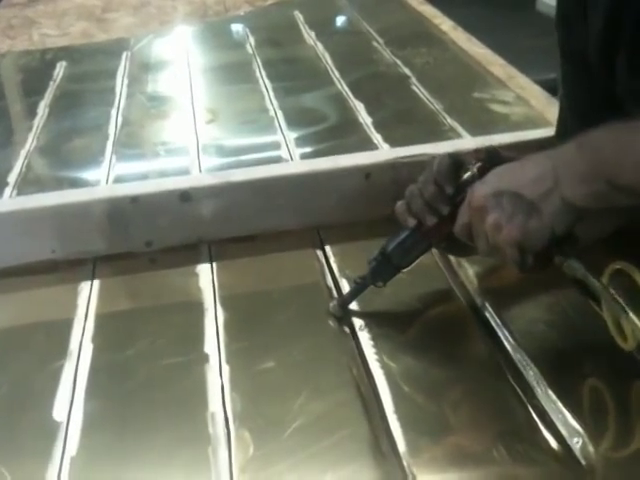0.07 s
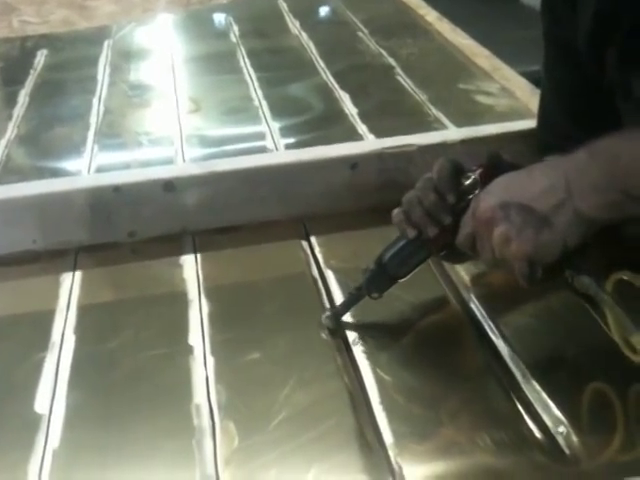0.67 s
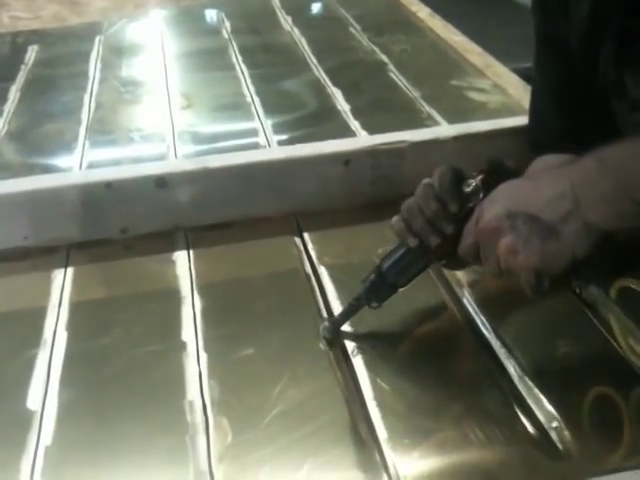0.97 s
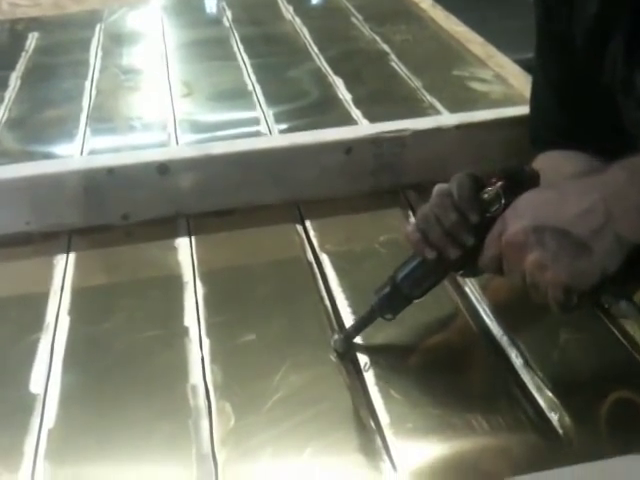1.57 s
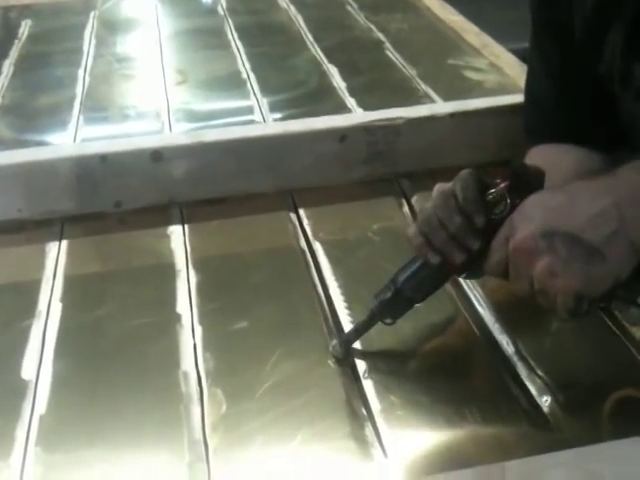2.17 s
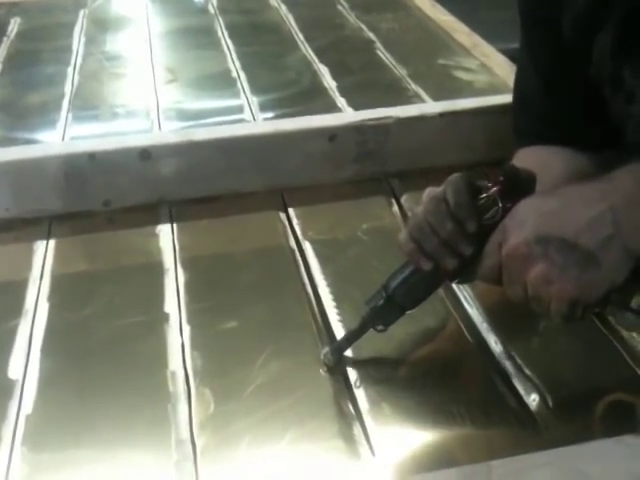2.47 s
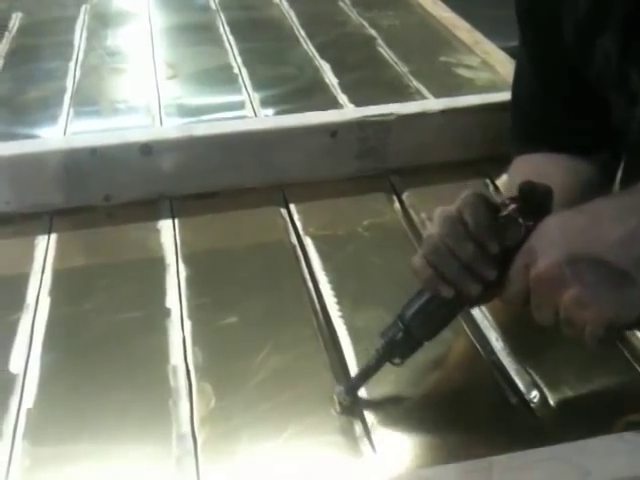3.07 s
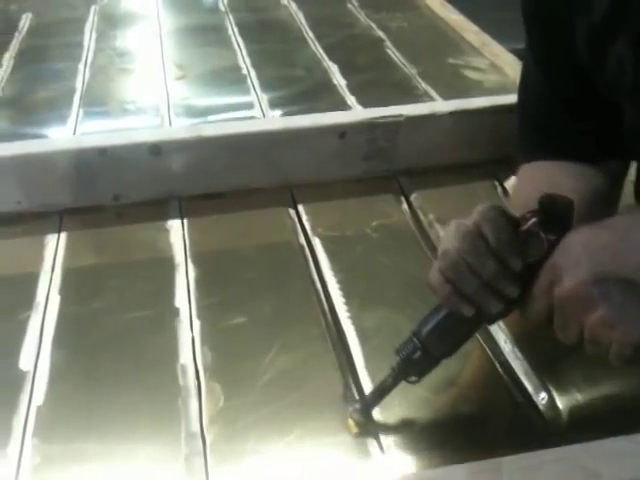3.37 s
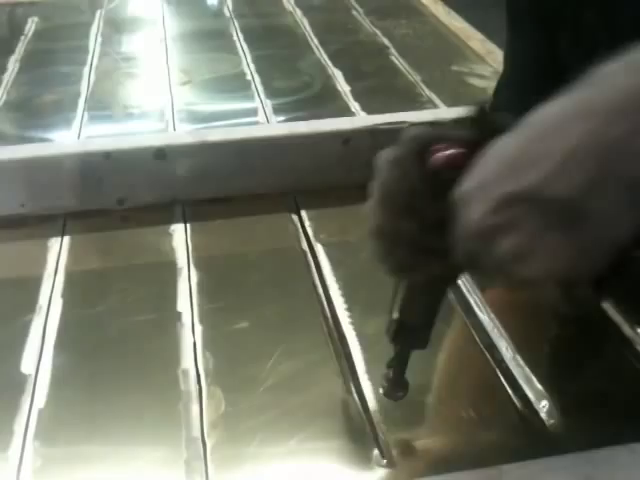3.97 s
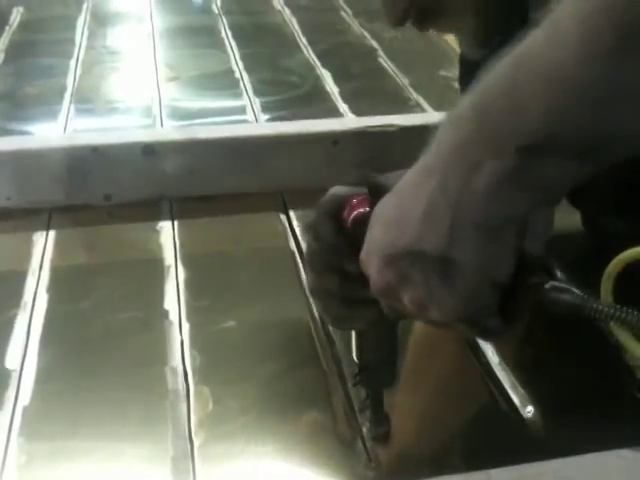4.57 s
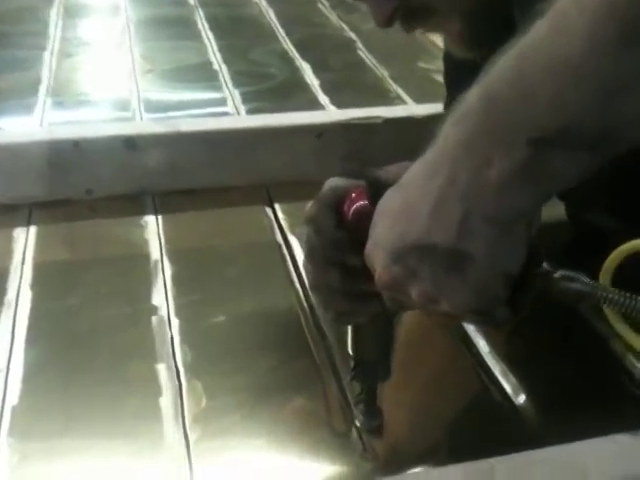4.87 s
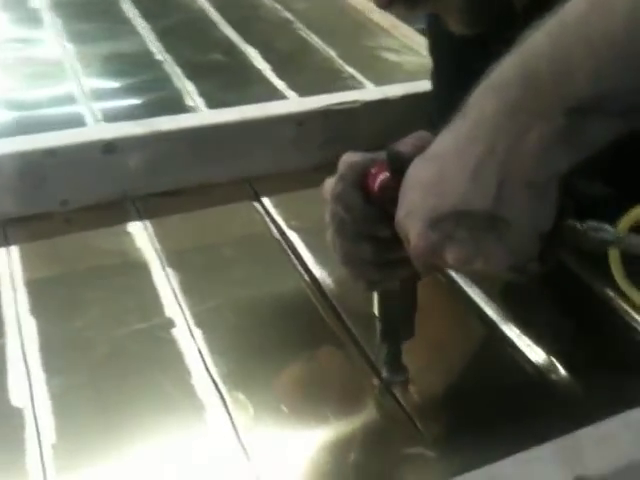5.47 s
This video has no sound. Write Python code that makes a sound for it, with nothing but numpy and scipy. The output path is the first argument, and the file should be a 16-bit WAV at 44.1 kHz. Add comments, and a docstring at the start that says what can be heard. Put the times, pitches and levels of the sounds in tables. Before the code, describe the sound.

From the start, a hand-held air hammer strikes a bronze sheet close to the microphone, about thirty-eight blows a second. The blows merge into a loud, buzzing metallic clatter with low thumps, a bright steel ring and strong pulsing exhaust hiss. The sound is slightly overdriven, and gusts of air pop on the microphone twice just before 1 second and again at about 3.0 and 3.2 seconds. At 3.7 seconds the hammer stops, with a bright tick as the tool lifts and a short workshop reverberation. In the pause, another machine throbs and drones faintly further off. At 4.9 seconds two quick spits of air lead into a second burst, faster at about forty-five blows a second. It slows slightly while hammering on to the end, at around 5.6 seconds.

```python
"""A hand-held air hammer works along a seam in bronze sheet, stops, is set down again and runs on faster.
Each stroke gives a valve thump, a blow that excites the modes of sheet and steel tool, a hiss of
turbulent exhaust and a return knock. The hall reverberates, and another machine throbs further off.
The close microphone is overdriven, and a few gusts of exhaust air pin it to its limit."""
import sys
import numpy as np
from scipy import signal
from scipy.fft import rfft, irfft
from scipy.io import wavfile
from scipy.ndimage import uniform_filter1d

SR = 44100
rng = np.random.default_rng(int(sys.argv[2]) if len(sys.argv) > 2 else 0)


def generate_wav(signal):
    """Clip the signal to [-1, 1] and save it as 16-bit WAV at the path in sys.argv[1]."""
    frames = np.transpose(np.atleast_2d(signal))
    scaled = np.clip(frames, -1, 1) * 32767
    pcm = np.round(scaled).astype(np.int16)
    wavfile.write(sys.argv[1], SR, pcm)


N = 243866
T = np.arange(N) / SR
MACHINE_HZ = 23.35  # stroke rate of the far machine


def hammer():
    """Periodic forcing: one stroke cycle times the exhaust, piston, sheet and tool in both bursts."""
    # stroke rate, nearly steady in the first burst, sagging in the second (time [s], rate [Hz])
    first_rate = [(0, 38.18), (.31, 38.35), (2.08, 37.55), (2.27, 38.03), (2.79, 37.52), (3.15, 38.82),
                  (3.68, 38.07)]
    second_rate = [(4.9, 45.2), (5.53, 40.96)]
    # trigger pulls (opening [s], closing [s], air gain [dB], blow gain [dB], thump gain [dB])
    pulls = [(-1, 3.658, 0.3, -1.5, -1.4), (4.907, 6, -0.6, 1, -2)]
    air, force, thump = sum(trigger_pull(*pull) for pull in pulls)
    thump = thump * undb(-3.5 * near(.65, reach_s=.35))  # an early, brief dip
    restart_s = pulls[1][0]
    phase = np.where(T < restart_s, cycle(first_rate, start_s=.0216), cycle(second_rate, start_s=4.8958))
    strokes = air * exhaust(phase) + thump * piston(phase) + sheet(phase, force) + tool(phase, force)
    return strokes + tick_and_spits()


def trigger_pull(open_s, close_s, air_db, blow_db, thump_db):
    """Inertia: the piston's swing lags the air, then coasts. Gives air flow, blow force and thump gain."""
    coast_s, bite_s = .022, .22
    air = envelope(open_s, close_s, attack_s=.014, release_s=.012)
    swing = envelope(open_s, close_s + coast_s, attack_s=.036, release_s=.008)
    bite_db = 3.5 * np.exp(-np.abs(T - open_s) / bite_s)  # harder just after the tool is set down
    force = air * swing ** 3 * undb(blow_db + bite_db)
    return np.array([air * undb(air_db), force, swing * undb(thump_db)])


def sheet(phase, force):
    """Impact excitation: blow and return knock ring the bronze; a mode is loudest struck at its antinode."""
    # sheet modes (frequency [Hz], t60 [s], relative level [dB], tip at antinode [s], reach [s])
    bronze_modes = [(138.4, 0.19, -10, 5.35, 0.27), (188.6, 0.24, -11, 2.4, 1.1), (256, .07, -11, 5.3, .25),
                    (275.4, 0.099, -4, 0.51, 0.41), (333.4, 0.14, -10, 2.9, 0.85),
                    (490, 0.14, -4, 3.29, 0.35), (727, 0.044, -5, 2.57, 0.5), (744, 0.2, -4, 1.8, 0.12),
                    (795, 0.066, -2, 0.37, 0.49), (902, 0.039, -3.5, 5.27, 0.21),
                    (917, .05, -8, 1.28, 0.46), (949.7, 0.17, -5, 0.26, 0.33), (940, 0.22, -7, 2.28, 0.14),
                    (1084, 0.066, -3, 0.91, 0.48), (1125, 0.035, -0.5, 0.19, 0.47),
                    (1140, 0.14, -3, 2.47, 0.35), (1143, 0.056, -6, 5.46, 0.15),
                    (1230, 0.021, -1, 1.67, 0.19), (1407, 0.059, -2.5, 1.1, 0.34),
                    (1385, .05, -6.5, 5.12, 0.1), (1570, 0.07, -8, 0.42, .3), (1645, 0.077, -7.5, 2, 0.36),
                    (1810, 0.11, -9.5, 0.14, 0.3), (2096, 0.041, -6.5, 1.44, 0.38)]
    # spectrum of the clang (frequency [Hz], gain [dB])
    spectrum = [(120, -42.5), (400, -19), (600, -6), (800, 0), (1250, 0), (1700, -3), (2100, -5.5),
                (2600, -10), (4500, -7), (7000, -13.5), (12000, -14), (20000, -27)]
    blows = strikes(phase, at=.145, scatter_db=.6, jitter_s=.0001)
    knocks = strikes(phase, at=.67, scatter_db=1, jitter_s=.00025)
    hits = force * (blows + undb(-8) * knocks)
    clang = level(colour(dense_modes(hits, t60=.054, mixes=16), spectrum), -15.5)
    return clang + undb(-18) * modes(hits, bronze_modes)


def tool(phase, force):
    """Impact excitation: the piston rings the steel tool, whose tip then cracks against the sheet."""
    # tool modes, varying with tilt (frequency [Hz], t60 [s], relative level [dB], peak [s], reach [s])
    steel_modes = [(10850, .028, -1, 3.45, .3), (10900, .018, -8, 2, 1.6), (9900, .012, -8, .8, 1.6),
                   (9950, .01, -7, 5.05, .15), (13800, .03, -17, 1.5, 2), (14300, .03, -17, 1, 2)]
    # spectrum of the tip's crack (frequency [Hz], gain [dB])
    spectrum = [(800, -16), (2000, -2.5), (4000, -2), (5500, 0.5), (8000, -18), (14000, -2), (18000, 3)]
    hits = force * strikes(phase, at=.09, scatter_db=2.8, jitter_s=.0001)
    ringing = undb(-18) * modes(hits, steel_modes)
    since_contact = (phase - .22) % 1
    crack = force * rng.standard_normal(N) * np.exp(-since_contact / .053)
    return ringing + level(colour(crack, spectrum), -19)


def piston(phase):
    """Pressure pulses: the valve thumps as the stroke starts, and more weakly on the way back."""
    # spectrum of the thump (frequency [Hz], gain [dB])
    spectrum = [(70, -38.5), (120, -22), (155, -8.5), (190, 0), (230, -2.5), (280, -2), (370, -6.5),
                (450, -10), (600, -14.5), (1500, -33.5)]
    forward = strikes(phase, at=.94, scatter_db=.3, jitter_s=.0001)
    back = strikes(phase, at=.6245, scatter_db=.5, jitter_s=.0005)
    return level(colour(forward + undb(-12) * back, spectrum), -18.5)


def exhaust(phase):
    """Turbulent jet noise: a steady leak, a spit at the valve and a long hiss as the cylinder empties."""
    # spectrum of the jet (frequency [Hz], gain [dB])
    spectrum = [(300, -10.5), (1500, -5), (3000, -7), (5500, -3), (6600, -0.5), (7600, 2.5), (8600, -5.5),
                (10200, 0.5), (11500, -2), (15000, -7.5), (19000, -8)]
    flow = .22 + .5 * pulse(phase, at=.049, width=.048) + pulse(phase, at=.46, width=.097)
    # no two strokes are equally strong
    wander_db = 1.6 * np.interp(phase % 256, np.arange(256), rng.standard_normal(256))
    return level(colour(undb(wander_db) * flow * rng.standard_normal(N), spectrum), -10)


def tick_and_spits():
    """Noise transients: a bright tick as the tool lifts off, two spits of air as the trigger reopens."""
    # the tick, then the two spits (time [s], reach [s], level [dB])
    transients = [(3.727, 0.0017, -17.5), (4.891, 0.0023, -14.5), (4.91, 0.0022, -13)]
    # their common spectrum (frequency [Hz], gain [dB])
    spectrum = [(500, -24), (2000, -10), (4000, -2), (6000, 2), (10000, 3), (12000, -3.5), (18000, -9)]
    gain = sum(undb(db) * near(time_s, reach_s) for time_s, reach_s, db in transients)
    return gain * level(colour(rng.standard_normal(N), spectrum), 0)


def gusts():
    """Damped response: exhaust gusts pull on the microphone diaphragm; some make it rebound and settle."""
    # gusts (time [s], pull length [s], rebound length [s], relative pressure [1])
    puffs = [(.8598, .0075, 0, 1.2), (.9648, .0076, .0132, 2.2), (3.028, .017, .0015, 2.4),
             (3.1843, .018, .003, 2.9), (5.099, .007, 0, .15)]
    pressure = np.zeros(N)
    for start_s, pull_s, rebound_s, strength in puffs:
        settle_s = .27 * rebound_s
        for length_s, push in (pull_s, -1), (rebound_s, 1), (settle_s, -.5):
            pressure += strength * push * ((T >= start_s) & (T < start_s + length_s))
            start_s += length_s
    return uniform_filter1d(uniform_filter1d(pressure, size=40), size=40)


def hall(direct):
    """Reverberation: the crowded modes of the room prolong the direct sound."""
    # spectrum of the room's response (frequency [Hz], gain [dB])
    spectrum = [(80, -22), (250, -2.5), (600, 1), (1200, -3.5), (3000, -3), (6000, -8), (11000, -11),
                (15000, -23)]
    return level(colour(dense_modes(direct, t60=.65, mixes=12), spectrum), -18)


def far_machine():
    """Amplitude modulation: over a drone, a high note, a rattle and a hiss throb at the stroke rate."""
    # rattling resonances (frequency [Hz], bandwidth [Hz], relative level [dB])
    resonances = [(1600, 64, -1), (3450, 94, -1.5), (4500, 110, -12), (5300, 170, 3), (7580, 190, -1),
                  (10700, 400, -11)]
    # spectrum of the machine's noise (frequency [Hz], gain [dB])
    spectrum = [(40, -50), (80, -45), (124, -9), (200, -15.5), (330, -9), (455, -13.5), (615, -5),
                (850, -16.5), (1400, -19.5), (5200, -19.5), (9000, -26.5), (11000, -24), (13000, -35),
                (16000, -38)]
    phase, note_hz = MACHINE_HZ * T, 1191
    drone = housing(phase)
    note = np.sin(2 * np.pi * note_hz * T) * (1 + .59 * np.sin(2 * np.pi * phase))
    shaking = rng.standard_normal(N) * (.5 + pulse(phase, at=.33, width=.24))
    rattle = sum(level(band(shaking, hz, width), db) for hz, width, db in resonances)
    hiss = colour(rng.standard_normal(N) * (1 + .5 * pulse(phase, at=.39, width=.065)), spectrum)
    return level(drone, -36) + level(note, -45.5) + level(rattle, -46) + level(hiss, -34.5)


def housing(phase):
    """Forced resonance: harmonics of the far machine's stroke are loud near a mode of its housing."""
    # housing resonances (frequency [Hz], bandwidth [Hz], gain [dB])
    resonances = [(140, 20, -3), (257, 30, 0), (355, 55, 3), (505, 40, -4), (605, 30, 0), (700, 70, -5)]
    drone = 0
    for k in range(5, 35):
        gain = sum(undb(db) / (1 + (2 * (k * MACHINE_HZ - hz) / width) ** 2) for hz, width, db in resonances)
        drone += gain * np.sin(2 * np.pi * (k * phase + rng.random()))
    return drone


def modes(hits, table):
    """Modal superposition: damped resonators, each swelling and fading as the tool moves."""
    out = 0
    for hz, t60, db, time_s, reach_s in table:
        radius = np.exp(-np.log(1000) / (t60 * SR))
        angle = 2 * np.pi * hz / SR
        tone = signal.lfilter([1, 0, -1], [1, -2 * radius * np.cos(angle), radius ** 2], hits + 1e-18)
        out += level(tone, db) * near(time_s, reach_s)
    return out


def dense_modes(x, t60, mixes):
    """Modal overlap: countless modes ring as decaying noise, their mix changing as the tool moves."""
    decay = np.exp(-np.log(1000) * T[:int(t60 * SR)] / t60)
    place = (mixes - 1) * T / T[-1]
    out = np.zeros(N + 2 * SR)
    for k in range(mixes):
        span = np.flatnonzero(np.abs(place - k) < 1)
        share = x[span] * np.cos(np.pi / 2 * (place[span] - k))  # equal-power crossfade
        part = signal.oaconvolve(share, decay * rng.standard_normal(SR)[:len(decay)])
        out[span[0]:span[0] + len(part)] += part
    return out[:N]


def cycle(rate, start_s):
    """Phase as the integral of rate: strokes counted from start_s."""
    count = np.cumsum(np.interp(T, *np.transpose(rate))) / SR
    return count - np.interp(start_s, T, count)


def strikes(phase, at, scatter_db, jitter_s):
    """Impulse train: one hit a stroke at a given phase, uneven in time and strength."""
    onsets = np.flatnonzero(np.diff(np.floor(phase - at)) > 0)
    timing, strength = rng.standard_normal((len(onsets), 2)).T
    onsets += (jitter_s * SR * timing).astype(int)
    out = np.zeros(N)
    out[np.clip(onsets, 0, N - 1)] = undb(scatter_db * strength)
    return out


def pulse(phase, at, width):
    """Periodic Gaussian pulse, with place and width in cycles."""
    return np.exp(-.5 * (((phase - at + .5) % 1 - .5) / width) ** 2)


def near(time_s, reach_s):
    """Gaussian window around one moment; the reach is its standard deviation."""
    return np.exp(-.5 * np.minimum(((T - time_s) / reach_s) ** 2, 100))


def envelope(start_s, stop_s, attack_s, release_s):
    """Linear rise, hold and exponential decay."""
    return np.clip((T - start_s) / attack_s, 0, 1) * np.exp(-np.maximum(T - stop_s, 0) / release_s)


def colour(x, spectrum):
    """Minimum-phase filter through points of (frequency [Hz], gain [dB])."""
    hz, db = np.transpose(spectrum)
    size = 4096
    freq = np.arange(size // 2 + 1) * SR / size
    gain = undb(np.interp(np.log(freq + 1), np.log(hz), db))
    cepstrum = irfft(np.log(gain))
    cepstrum[1:size // 2] *= 2  # folding the cepstrum makes the response causal
    cepstrum[size // 2 + 1:] = 0
    response = irfft(np.exp(rfft(cepstrum)))
    return signal.oaconvolve(x, response)[:N]


def band(x, hz, width_hz):
    """Second-order resonance."""
    return signal.lfilter(*signal.iirpeak(hz, hz / width_hz, fs=SR), x)


def level(x, db):
    """Normalisation to an rms level."""
    return x * undb(db) / np.sqrt(np.mean(x ** 2) + 1e-18)


def undb(db):
    """Decibels to amplitude ratio."""
    return 10 ** (np.asarray(db) / 20)


def scene():
    """Superposition of the close hammer, its reverberation, the far machine and the gusts."""
    direct = hammer()
    return (direct + hall(direct) + far_machine() + gusts())[None]


def record(dry):
    """Symmetric saturation: the input overloads alike both ways, then a steep low-pass cuts the top."""
    ceiling, drive, cutoff_hz = .68, 1.15, 15800
    x = drive * dry / ceiling
    clipped = ceiling * x / (1 + x ** 4) ** (1 / 4)
    return signal.sosfilt(signal.ellip(10, .2, 70, cutoff_hz, fs=SR, output="sos"), clipped)


dry = scene()
out = record(dry)
generate_wav(out)
```